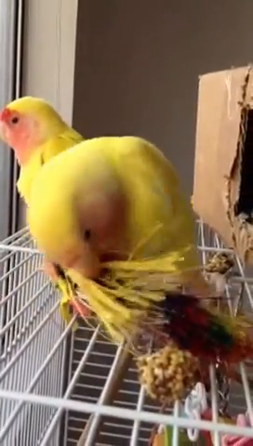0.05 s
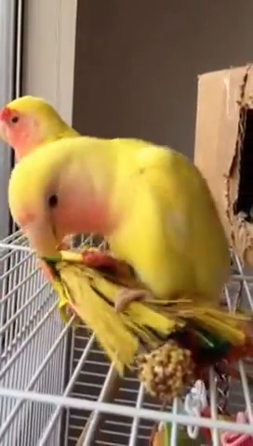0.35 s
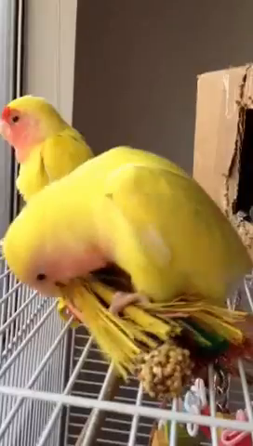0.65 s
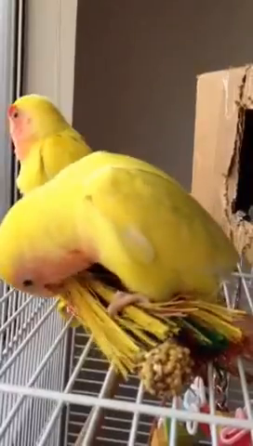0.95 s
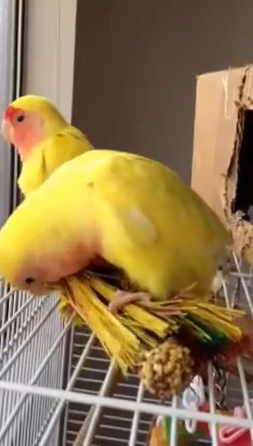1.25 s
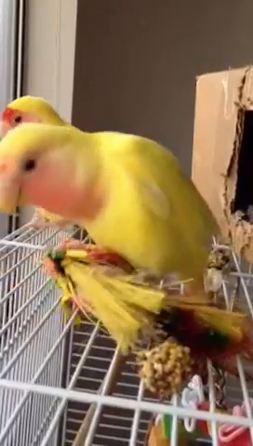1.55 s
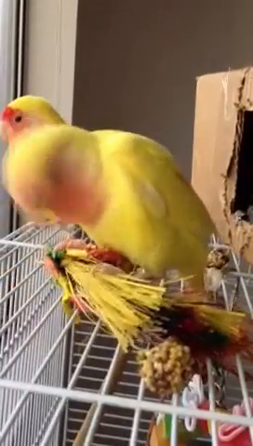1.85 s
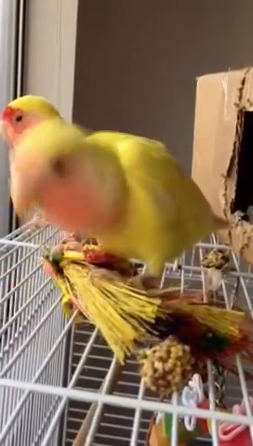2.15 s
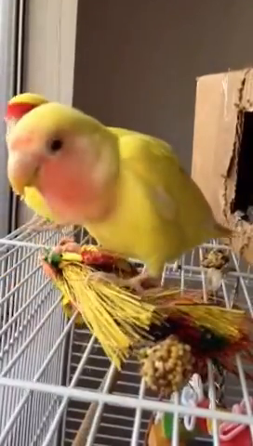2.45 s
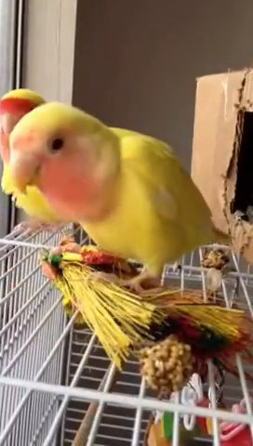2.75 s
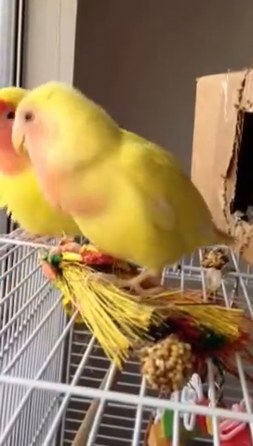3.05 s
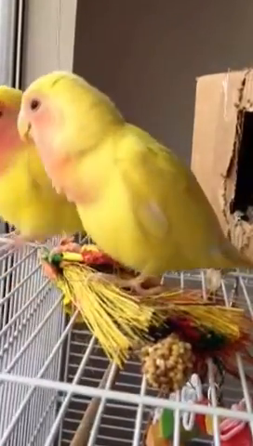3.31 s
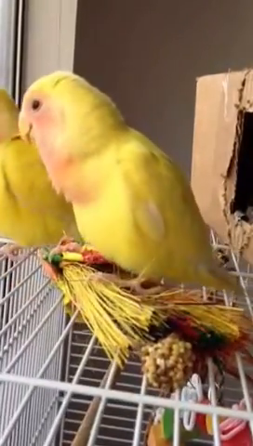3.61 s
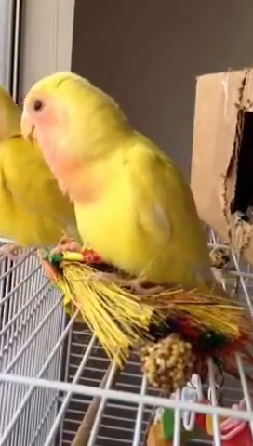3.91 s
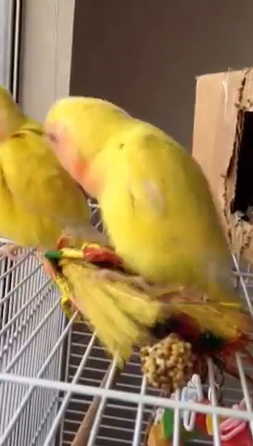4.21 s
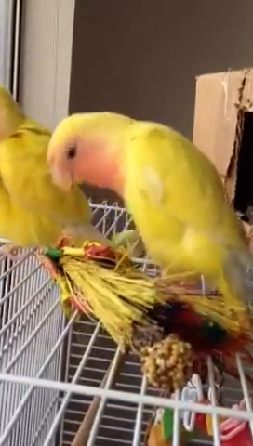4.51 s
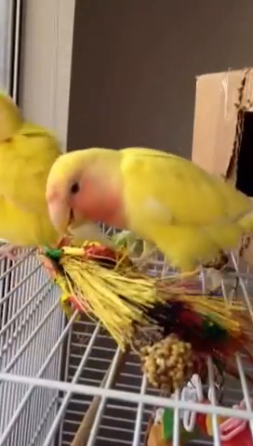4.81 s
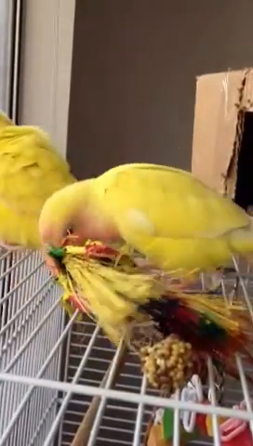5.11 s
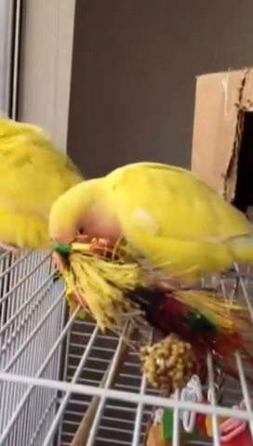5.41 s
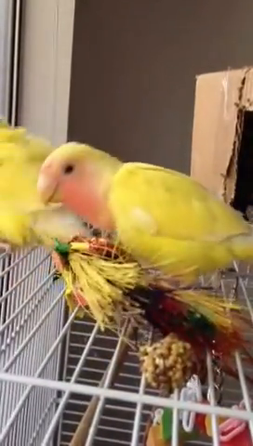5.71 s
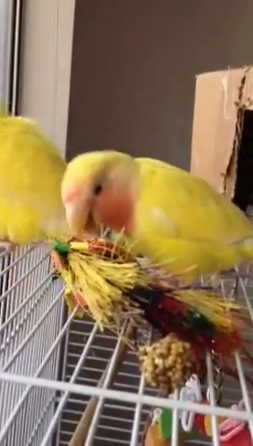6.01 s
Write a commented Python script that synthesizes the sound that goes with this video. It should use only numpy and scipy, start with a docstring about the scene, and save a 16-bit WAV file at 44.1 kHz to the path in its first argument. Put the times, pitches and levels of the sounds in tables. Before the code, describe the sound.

A lovebird picks at a straw toy with faint crackles and beak clicks, gives one sharp chirp, then lightly bumps its wire cage.

```python
"""A small, quiet room, the microphone close to a lovebird on top of a wire cage.
The bird picks at a straw toy: fibres snap and rustle under its beak and feet. One loud chirp, a buzzy
note from the syrinx that flips up into a squeak, lights up the room. Then the toy bumps the cage,
whose wires ring. Behind it all lie room air, a faint mains hum and two far-off blips."""
import sys
import numpy as np
from scipy import signal
from scipy.fft import rfft, irfft, next_fast_len
from scipy.io import wavfile
from scipy.ndimage import uniform_filter1d

SR = 44100
rng = np.random.default_rng(int(sys.argv[2]) if len(sys.argv) > 2 else 0)


def persist_wave(psi):
    """Save psi, clipped to +-1, as 16-bit WAV."""
    counts = np.round(np.clip(psi, -1, 1) * 32767).astype(np.int16)
    wavfile.write(sys.argv[1], SR, np.atleast_2d(counts).T)


N = 267246
TIME = np.arange(N) / SR

# room air and hiss: (frequency [Hz], relative level [dB])
AIR_SPECTRUM = [(30, -32), (65, -26.5), (95, -13), (150, -3.5), (230, -1.5), (330, -6.5), (800, -13),
                (1250, -15), (2500, -20.5), (5500, -22.5), (8600, -23.5), (9900, -30.5), (11700, -25),
                (15000, -24)]
# strokes through the straw: (start [s], length [s], level [dB], toy body relative to stroke [dB])
STRAW_STROKES = [(0.002, 0.15, -71.5, -3.5), (0.178, 0.13, -68, -5), (0.373, 0.026, -52.5, -14),
                 (0.662, 0.03, -63, -12), (0.7, 0.026, -56.5, -6), (1.125, 0.037, -72, -14),
                 (1.26, 0.05, -74, -10), (1.515, 0.089, -68.5, -6.5), (3.508, 0.037, -72.5, -14),
                 (4.264, 0.021, -61, -15), (4.41, 0.038, -70, -10), (4.655, 0.104, -71.5, 4.5),
                 (4.986, 0.068, -64, -0.5), (5.259, 0.19, -73, -4), (5.594, 0.021, -57, 2),
                 (5.639, 0.055, -56.5, 1), (5.711, 0.057, -57.5, 3)]
# slipping fibres: (frequency [Hz], relative level [dB])
STRAW_SPECTRUM = [(80, -21), (400, -20), (1500, -11.5), (2500, -13), (3700, 2), (5300, -7.5), (8100, 2),
                  (10300, -8.5), (12500, -1.5), (15500, -12)]
# body of the toy: (frequency [Hz], relative level [dB])
TOY_SPECTRUM = [(60, -39), (140, 10), (450, 4), (800, -2), (1250, 3), (1700, -4.5), (2300, 1), (5000, -43)]
# beak clicks and snapping fibres: (time [s], relative peak [dB], centre [Hz])
FIBRE_SNAPS = [(0.0477, -32, 5400), (0.131, -47, 4300), (0.332, -41, 4800), (0.369, -40, 8030),
               (0.4, -35, 7920), (0.6798, -44, 8200), (1.161, -49, 7830), (1.276, -47.5, 9320),
               (1.732, -51.5, 7430), (4.169, -48, 10620), (4.2775, -40.5, 6090), (4.4769, -48, 4016),
               (5.5293, -51.5, 3600)]
# tone shared by all cracks: (frequency [Hz], relative level [dB])
SNAP_SPECTRUM = [(200, -51.5), (1300, -4), (2200, 0), (4000, 0), (5500, -8), (8000, 1.5), (10500, -3),
                 (15000, -7.5)]
# far-off blips: (time [s], level [dB])
FAR_BLIPS = [(2.65, -64.5), (3.065, -72)]
# the buzzy note before its scoop and flip are added: (time [s], pitch [Hz])
NOTE_BASE_PITCH = [(2.718, 1806), (2.723, 1746), (2.730, 1863), (2.737, 1761), (2.750, 1739), (2.765, 1660),
                   (2.777, 1715)]
# throat and beak resonances in the buzzy note: (frequency [Hz], gain [dB])
NOTE_RESONANCES = [(120, -66), (700, -33.5), (1400, -25), (1670, -6.5), (1810, -5.5), (2050, -14),
                   (2900, -13.5), (3480, 0), (4250, -9), (5400, -8.5), (6150, -14), (7100, -7.5),
                   (8600, -7.5), (11000, -16), (15000, -25)]
# throat and beak resonances in the squeak: (frequency [Hz], gain [dB])
SQUEAK_RESONANCES = [(120, -70), (700, -45.5), (2700, -18.5), (4000, 1.5), (4900, -2), (6200, -22.5),
                     (8500, -1), (9700, -2), (10700, -19.5), (12000, -4), (13200, -16), (14500, -12)]
# toy and feet bumping the cage: (time [s], thud [dB], wire ring [dB], claw click [dB])
CAGE_BUMPS = [(3.12, -68.5, -85, -75), (3.439, -64, -82, -75), (3.514, -62.5, -75, -75),
              (4.317, -46, -81, -53), (4.341, -52, -76, -62), (5.602, -54.5, -78, -40),
              (5.640, -48.5, -61.5, -35), (5.723, -62, -66, -36), (5.744, -66, -54.5, -37),
              (5.772, -58, -58, -60)]
# dull knock on the cage: (frequency [Hz], relative level [dB])
THUD_SPECTRUM = [(80, -28), (200, -5), (340, -8.5), (430, -7), (528, 9.5), (600, -18), (720, -6),
                 (930, -10), (1170, 8), (1400, -12), (1650, -18), (2200, -12), (5000, -34.5)]
# lingering rumble of the cage frame: (frequency [Hz], relative level [dB])
FRAME_SPECTRUM = [(100, -30), (300, -15), (470, -8), (535, 3.5), (610, -16), (720, -8), (900, -17.5),
                  (1150, -11.5), (2000, -28.5), (5000, -37)]
# ringing cage wires: (frequency [Hz], relative level [dB], T60 [s])
WIRE_MODES = [(537, -13, 1.1), (690.2, -13, 1.8), (860, -17, 1.1), (1210, -16, 1.5), (1318, -14.5, 2.7),
              (2210, -15, .9), (3254, 5.5, 0.3), (3300, -15.5, 1.5), (4530, -8, 0.49)]
# near reflections from window, wall and box: (delay [s], level [dB])
REFLECTIONS = [(.0013, -26), (.0029, -17), (.0052, -17), (.0094, -14.5)]
# main decay of the room: (frequency [Hz], T60 [s])
ROOM_DECAY = [(200, .42), (1750, .44), (4500, .41), (9000, .31), (14500, .27)]


def undb(db):
    """Decibels to gain."""
    return 10 ** (np.asarray(db) / 20)


def unit(x):
    """Scale to rms 1."""
    return x / np.sqrt(np.mean(x ** 2))


def lookup(points, hz):
    """Read (Hz, value) points on a log-frequency axis."""
    f, value = np.transpose(points)
    return np.interp(np.log(np.maximum(hz, 1)), np.log(f), value)


def colour(x, points):
    """Causal filter with the given (Hz, dB) response, built from its cepstrum."""
    size = next_fast_len(len(x) + 4096) * 2
    gain = undb(lookup(points, np.linspace(0, SR / 2, size // 2 + 1)))
    cepstrum = irfft(np.log(gain))
    cepstrum[1:size // 2] *= 2
    cepstrum[size // 2 + 1:] = 0
    return irfft(rfft(x, size) * np.exp(rfft(cepstrum)))[:len(x)]


def shaped_noise(count, spectrum):
    """Noise of rms 1 with the given spectrum."""
    return unit(colour(rng.standard_normal(count), spectrum))


def walk(rate):
    """Smooth random motion with spread 1."""
    k = max(int(SR / rate), 1)
    return unit(uniform_filter1d(uniform_filter1d(rng.standard_normal(N), k), k))


def fade(t, t60):
    """Decay by 60 dB in t60 seconds."""
    return np.exp(-np.log(1000) * t / t60)


def ramp(t, start, length):
    """Rise from 0 to 1 over length seconds."""
    return np.clip((t - start) / length, 0, 1)


def gate_db(t, start, attack, end, release=.003, quiet_db=-30):
    """Attack, hold and release of a note, in dB."""
    return quiet_db * (1 - ramp(t, start, attack) + ramp(t, end - release, release))


def add(out, s, sound):
    """Mix a sound in at time s."""
    i = max(int(s * SR), 0)
    out[i:i + len(sound)] += sound[:N - i]


def room_tone(air_db=-64.5, hum_hz=120, hum_db=-72):
    """Steady room air and hiss with the mains hum of an appliance."""
    air = shaped_noise(N, AIR_SPECTRUM) * undb(air_db)
    hum = np.sqrt(2) * np.sin(2 * np.pi * hum_hz * TIME) * undb(hum_db)
    return air + hum


def straw_rustle(slips_per_s=2200, spread_db=5.0, grain_t60=0.018, attack_s=0.009):
    """Fibres slip past each other in a spray of tiny clicks; firm strokes also shake the toy's body."""
    slips = (rng.random(N) < slips_per_s / SR) * rng.choice([-1, 1], N)
    slips = slips * undb(spread_db * np.minimum(rng.exponential(size=N), 4))
    # each slip trails a short grain of noise
    grain_power = signal.fftconvolve(slips ** 2, fade(TIME[:SR // 40], grain_t60) / 60)[:N].clip(0)
    grains = np.sqrt(grain_power) * rng.standard_normal(N)
    crackle = undb(1.5) * unit(colour(slips + grains, STRAW_SPECTRUM))
    body = shaped_noise(N, TOY_SPECTRUM)
    crackle_power, body_power = np.zeros(N), np.zeros(N)
    # each bump on the cage also shakes the straw briefly
    shakes = [(s, 0.031, thud_db - 18, 0) for s, thud_db, _, _ in CAGE_BUMPS]
    for s, length, db, body_db in STRAW_STROKES + shakes:
        after = np.maximum(TIME - s - length, 0)
        settling = undb(-12) * fade(after, t60=0.54)  # loosened fibres outlast the stroke
        release = np.maximum(fade(after, t60=0.098), settling)
        stroke = undb(db) * ramp(TIME, s, attack_s) * release
        crackle_power += stroke ** 2
        body_power += (stroke * undb(body_db)) ** 2
    return np.sqrt(crackle_power) * crackle + np.sqrt(body_power) * body


def nibbles(until_s=1.75, per_s=9, db=-57, spread_db=6, hz=8500):
    """The beak ticks faintly at random in the straw: (time [s], relative peak [dB], centre [Hz])."""
    draws = rng.random((round(per_s * until_s), 2))
    return [(when * until_s, db + spread_db * (2 * size - 1), hz) for when, size in draws]


def snaps(snap_t60=.016, claw_hz=3040, claw_t60=0.032, width_octaves=1.95, rise_s=0.0002, gain_db=-1):
    """Each snap, nibble or claw click is a sharp crack that dies quickly; thin fibres sound higher."""
    out, t = np.zeros(N), TIME[:SR // 8]
    bands = np.geomspace(200, 16000, 12)
    cracks = [(s, db, hz, snap_t60) for s, db, hz in FIBRE_SNAPS]
    cracks += [(s, db, claw_hz, claw_t60) for s, _, _, db in CAGE_BUMPS]
    cracks += [(s, db, hz, snap_t60) for s, db, hz in nibbles()]
    for s, db, hz, t60 in cracks:
        focus_db = -10 * np.log10(1 + (np.log2(bands / hz) / width_octaves * 2) ** 2)
        burst = rng.standard_normal(len(t)) * (1 - np.exp(-t / rise_s)) * fade(t, t60)
        crack = colour(burst, np.c_[bands, lookup(SNAP_SPECTRUM, bands) + focus_db])
        add(out, s, undb(db + gain_db) * crack / np.abs(crack).max())
    return out


def far_blips(hz=890, width_s=.022, waver=0.021):
    """Far from the microphone, a faint wavering tone swells and fades twice."""
    pitch = hz * (1 + waver * walk(150.1))
    swells = sum(undb(db) * np.exp(-.5 * ((TIME - s) / width_s) ** 2) for s, db in FAR_BLIPS)
    return swells * np.sin(2 * np.pi * np.cumsum(pitch) / SR)


def syrinx(on, hz, db, rough, throat, jitter, rasp_db, flutter, flutter_hz=290):
    """A fluttering membrane sounds through the throat; roughness shakes its pitch and adds rasp."""
    # a fast, uneven wobble widens the upper partials into a buzz
    wobble_hz = flutter_hz * (1 + 0.24 * walk(200)[on])
    wobble = flutter * np.sin(2 * np.pi * np.cumsum(wobble_hz) / SR)
    pitch = hz * (1 + wobble + jitter * rough * walk(1500)[on])
    phase = 2 * np.pi * np.cumsum(pitch) / SR
    harmonic = np.arange(1, 10)[:, None]
    partials = np.sin(harmonic * phase + 2 * np.pi * rng.random(harmonic.shape))
    tone = np.sum((harmonic * hz < SR / 2) * partials, axis=0)
    # turbulent air escapes once a cycle
    rasp = undb(rasp_db) * rough * (1 + np.cos(phase)) * rng.standard_normal(len(hz))
    out = np.zeros(N)
    out[on] = undb(db) * (tone + rasp)
    return colour(out, throat)


def buzzy_note(start_s=2.709, break_s=2.777, end_s=2.799, scoop_hz=551, flip_hz=398, drive_db=-17):
    """The chirp opens sharp and rough, steadies as the membrane settles, then breaks upward."""
    on = (TIME > start_s) & (TIME < end_s)
    t = TIME[on]
    age, flip = t - start_s, ramp(t, break_s, .008)
    scoop = scoop_hz * np.exp(-age / .004)
    hz = np.interp(t, *np.transpose(NOTE_BASE_PITCH)) + scoop + flip_hz * flip
    db = drive_db - 7 * flip + gate_db(t, start_s, attack=.0062, end=end_s)
    unsettled = np.exp(-(age / .014) ** 2)
    rough = .08 + unsettled + .65 * np.sqrt(flip)
    return syrinx(on, hz, db, rough, NOTE_RESONANCES, jitter=0.029, rasp_db=5.5, flutter=0.025)


def squeak(start_s=2.784, end_s=2.8035, from_hz=3720, top_hz=4880, drive_db=-11, sag_db_per_s=160):
    """The other side of the syrinx ends the chirp: it shoots up to its top pitch and sags in level."""
    on = (TIME > start_s) & (TIME < end_s)
    t = TIME[on]
    hz = from_hz + (top_hz - from_hz) * ramp(t, start_s, .0068)
    db = drive_db - sag_db_per_s * (t - start_s) + gate_db(t, start_s, attack=0.0019, end=end_s)
    return syrinx(on, hz, db, rough=.45, throat=SQUEAK_RESONANCES, jitter=0.044, rasp_db=-3, flutter=.008)


def cage(thud_t60=0.13, rumble_t60=0.81, rumble_db=-9, contact_s=0.0064, detune=0.0019):
    """A soft bump gives a dull knock, lingers in the frame and leaves the wires ringing."""
    out, t = np.zeros(N), TIME[:SR]
    push = 1 - np.exp(-t / contact_s)
    for s, thud_db, ring_db, _ in CAGE_BUMPS:
        thud = shaped_noise(len(t), THUD_SPECTRUM) * fade(t, thud_t60)
        rumble = undb(rumble_db) * shaped_noise(len(t), FRAME_SPECTRUM) * fade(t, rumble_t60)
        ring = np.zeros(len(t))
        for hz, db, t60 in WIRE_MODES:
            # three neighbouring wires start together, drift apart and beat
            wire_hz = hz * (1 + detune * rng.standard_normal((3, 1)))
            wires = np.sin(2 * np.pi * (wire_hz * t + rng.random()))
            ring += undb(db) * fade(t, t60) * wires.sum(axis=0) / 2
        add(out, s, push * (undb(thud_db) * (thud + rumble) + undb(ring_db) * ring))
    return out


def room(x, wet_db=-8.0, build_s=0.002, late_db=-17, late_stretch=1.7):
    """Direct sound, near reflections, then a diffuse tail whose treble dies first and end lingers."""
    t = TIME[:int(.9 * SR)]
    noise = rfft(rng.standard_normal(len(t)))
    hz = np.linspace(0, SR / 2, len(noise))
    centres, t60s = np.transpose(ROOM_DECAY)
    tail = np.zeros(len(t))
    for share, t60 in zip(np.eye(len(centres)), t60s):
        band = irfft(noise * lookup(np.c_[centres, share], hz), len(t))
        tail += band * np.hypot(fade(t, t60), undb(late_db) * fade(t, late_stretch * t60))
    tail *= 1 - np.exp(-t / build_s)
    response = undb(wet_db) * tail / np.sqrt(np.sum(tail ** 2))
    response[0] = 1  # straight to the microphone
    for delay, db in REFLECTIONS:
        response[int(delay * SR)] += undb(db)
    return signal.fftconvolve(x, response)[:N]


def scene():
    """Bird, toy and cage close to one microphone, with far blips and room tone behind."""
    close = buzzy_note() + squeak() + snaps() + straw_rustle() + cage()
    return (room(close) + far_blips() + room_tone())[None]


def record(dry, top_hz=15500):
    """The recorder cuts the highest treble steeply."""
    return signal.sosfilt(signal.ellip(10, .2, 80, top_hz, fs=SR, output="sos"), dry)


dry = scene()
out = record(dry)
persist_wave(out)
```